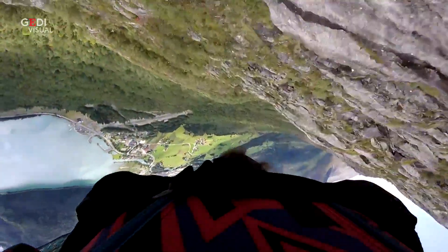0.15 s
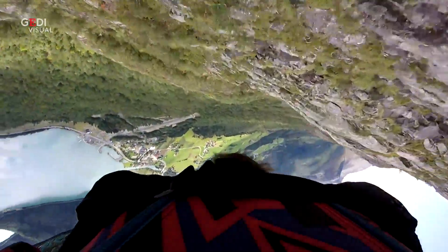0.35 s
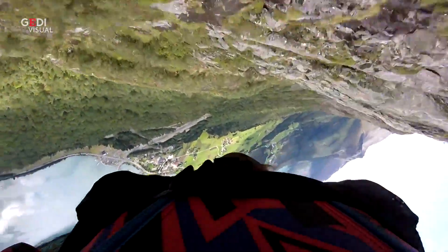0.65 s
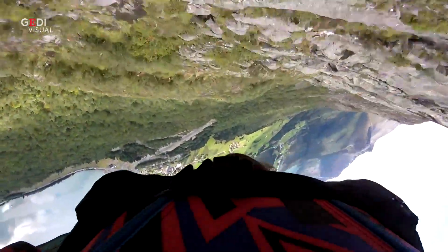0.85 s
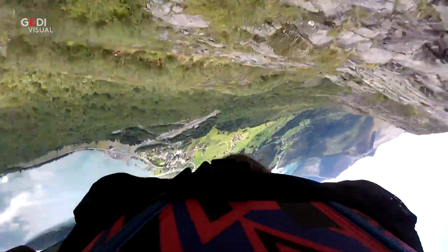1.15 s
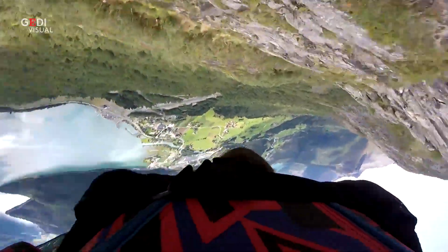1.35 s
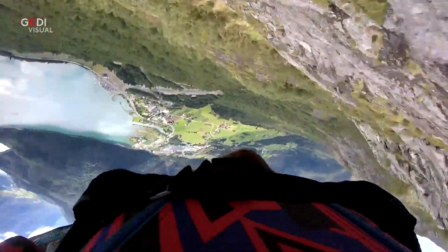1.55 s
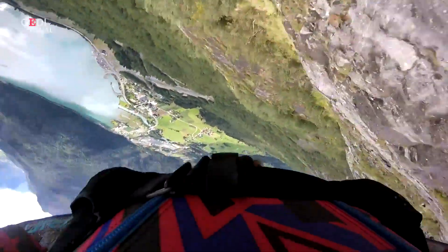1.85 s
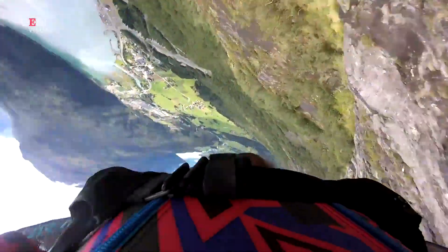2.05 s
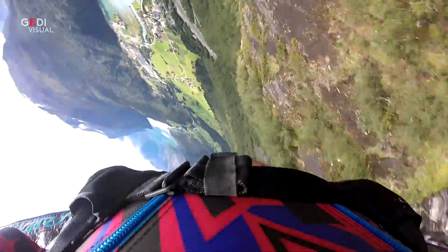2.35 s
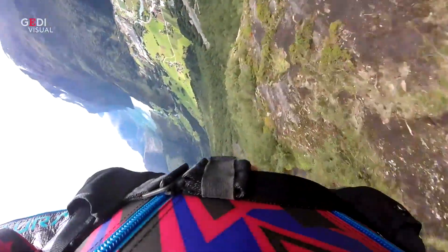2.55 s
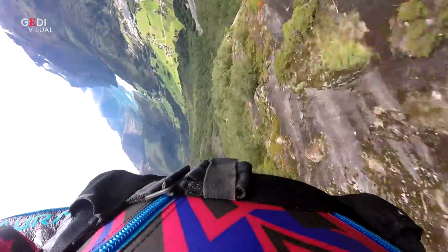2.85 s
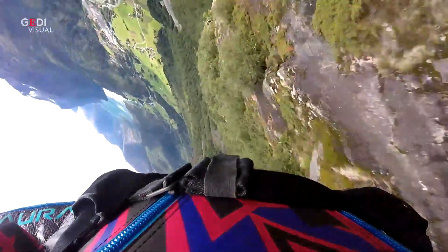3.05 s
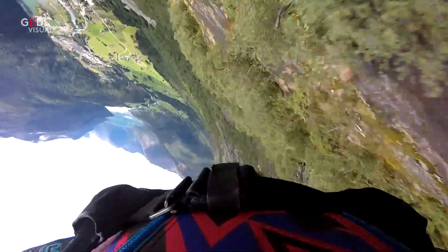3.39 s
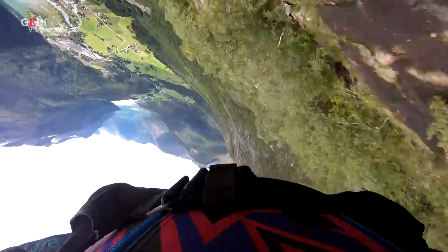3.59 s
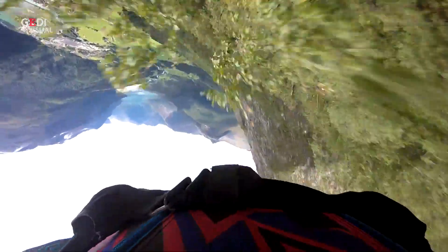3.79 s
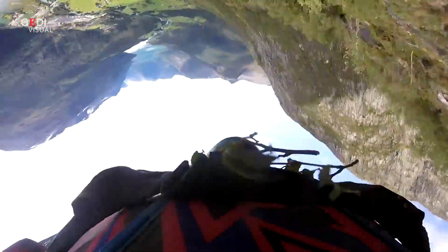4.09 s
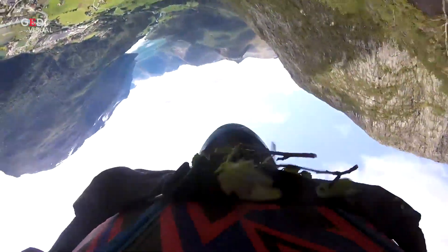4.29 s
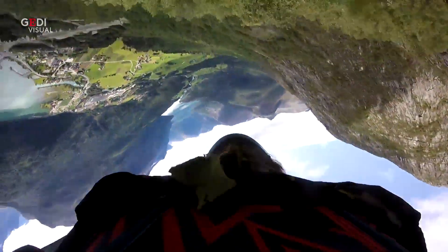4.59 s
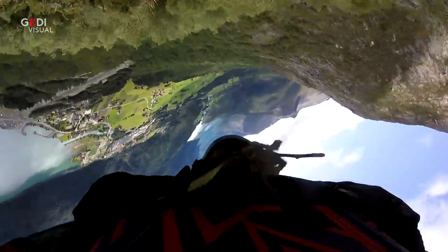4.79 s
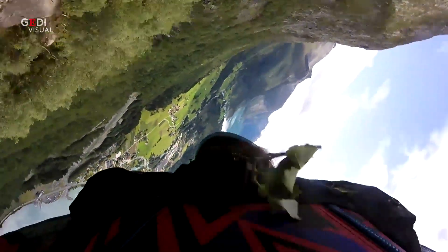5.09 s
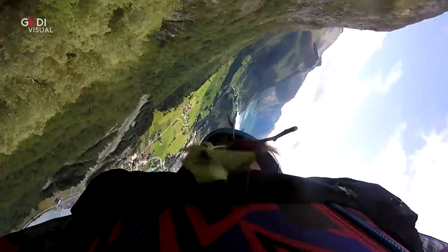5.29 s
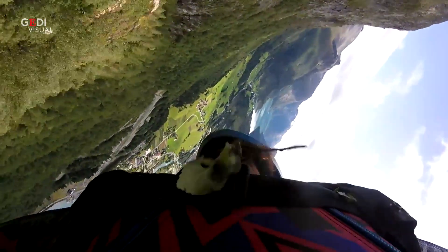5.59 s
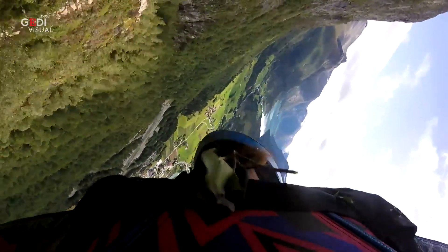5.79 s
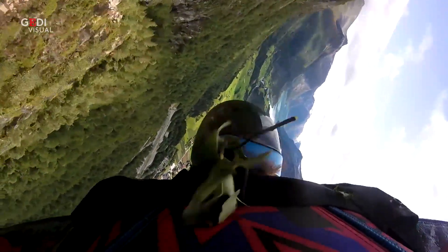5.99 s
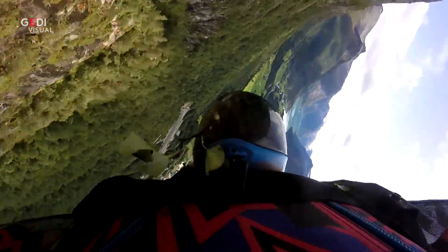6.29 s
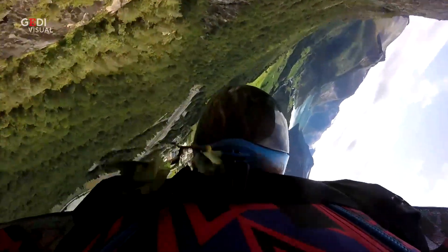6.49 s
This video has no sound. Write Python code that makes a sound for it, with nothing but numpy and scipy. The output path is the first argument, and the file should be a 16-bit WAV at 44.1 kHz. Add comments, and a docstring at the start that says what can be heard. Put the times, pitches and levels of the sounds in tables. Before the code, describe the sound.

A fast glide along a mountainside, heard from a microphone worn on the body. Dense wind dominates throughout: low thumping, throaty buffeting and a thinner airy hiss, wavering rapidly. After about four seconds a twig smacks and scrapes the housing with a hard crack; the wind ducks for a moment and swells back. Snagged leaves then tick and rustle irregularly over the continuing rush.

```python
"""Along a mountainside, air tears past a chest-mounted camera during a fast glide.
Eddies buffet the microphone port: shaped random spectra give thump, buffeting, roar and hiss.
Leaves tick and rustle on the housing and a twig whips it; short noises and blows excite its resonances.
Gain control ducks after each strong peak, then recovers; clipping and a band limit follow."""
import sys
import numpy as np
from scipy import signal
from scipy.io import wavfile
from scipy.ndimage import uniform_filter1d

SR = 44100
rng = np.random.default_rng(int(sys.argv[2]) if len(sys.argv) > 2 else 0)


def master_out(mix):
    """Clip the mix to full scale and print it as 16-bit PCM to the path in sys.argv[1]."""
    frames = np.transpose(np.atleast_2d(mix))
    ceiling = np.clip(frames, -1, 1)
    pcm = np.round(ceiling * 32767).astype(np.int16)
    wavfile.write(sys.argv[1], SR, pcm)


N = 292824

# Fine turbulence at the port, following the angle of the airflow; level before flutter
# [t/s, hiss level/dB]
HISS_LEVEL = [(0.0, -51.5), (0.07, -44), (0.11, -37), (0.21, -44), (0.3, -40.5), (0.37, -39), (0.39, -44.5),
              (0.44, -44.5), (0.67, -45.5), (0.92, -43), (1.19, -43), (1.27, -41.5), (1.38, -40.5),
              (1.5, -45.5), (1.61, -39.5), (1.8, -39), (1.9, -45.5), (2.09, -41), (2.45, -39.5),
              (2.53, -44.5), (2.66, -44), (2.75, -39.5), (3.02, -40), (3.3, -40.5), (3.6, -41),
              (3.8, -41.5), (4.05, -42), (4.35, -40.5), (4.43, -39), (4.45, -35.5), (4.6, -35), (4.72, -34),
              (4.75, -38.5), (4.82, -41), (4.98, -45.5), (5.15, -41.5), (5.35, -42), (5.59, -38),
              (5.65, -46), (5.8, -43), (5.95, -51.5), (6.19, -48), (6.3, -39), (6.55, -36), (6.64, -39.5)]
# Roar level relative to the hiss [t/s, level/dB]
ROAR_ABOVE_HISS = [(0.0, 8), (1.5, 7.5), (3.2, 7.5), (3.55, 11), (4.03, 11), (4.3, 6), (4.45, 7.5),
                   (4.6, 8.5), (4.75, 7), (5.2, 8), (6.64, 7)]
# Large eddies at the port; levels before flutter [t/s, buffeting level/dB, deep thump level/dB]
LARGE_EDDIES = [(0.0, -14.5, -20), (0.3, -15, -15), (0.65, -12.5, -24), (0.9, -14, -18.5),
                (1.15, -13.5, -22), (1.5, -16.5, -18.5), (2.0, -13, -18.5), (2.25, -16, -18.5),
                (3.4, -16, -18.5), (4.3, -18, -21), (4.5, -15, -21.5), (4.7, -15, -16.5), (4.9, -17, -20.5),
                (5.4, -17, -17.5), (6.0, -17.5, -17.5), (6.64, -14, -13.5)]
# Relative spectral densities of the four parts of the air noise [f/Hz, level per hertz/dB]
THUMP_SPECTRUM = [(12, -40), (20, -2), (40, 0.5), (80, 3), (150, 2.5), (230, -5.5), (400, -39)]
BUFFET_SPECTRUM = [(90, -5), (150, -8), (230, -1.5), (350, -3.5), (560, -7), (720, -13.5), (950, -24.5),
                   (1500, -36.5)]
ROAR_SPECTRUM = [(400, -22), (750, -2), (1000, -1), (1500, -2), (2050, -4.5), (2250, -14), (3200, -12),
                 (5000, -24)]
HISS_SPECTRUM = [(1200, -65), (2300, -2), (3000, -5.5), (3750, -3.5), (4000, -6.5), (4700, -9),
                 (5500, -6.5), (6400, -5), (7400, -10), (10000, -14), (11300, -21), (12600, -22),
                 (14000, -28.5), (15600, -33)]
# Resonant modes of the housing, before contact damping and tilt [f/Hz, width of one stage/Hz, level/dB]
HOUSING_MODES = [(280, 350, -14), (560, 400, -12), (990, 340, -7), (2030, 400, -8), (2900, 1100, -18),
                 (3700, 1800, -15), (5450, 1300, -14.5), (7200, 2000, -18), (9100, 2800, -27),
                 (11000, 2600, -35), (13000, 2200, -43)]
# Leaves and twig ends touching the housing
# [t/s, level/dB, lightness/(dB per octave), sharpness/(dB per octave)]
LEAF_TICKS = [(3.7285, -27, 1, 7), (4.0729, -21, 5, 4), (4.0759, -18, 6, 1), (4.082, -15, 3, 6),
              (4.1162, -24, 2, 4), (4.1568, -17, -3, 12), (4.1615, -20, -5, 3), (4.4495, -12, 8, 1),
              (4.8018, -25, -3, 4), (4.8284, -30, 10, 0), (5.2277, -24, 6, 0), (5.2344, -29, 8, -1),
              (5.2514, -26, 5, 4), (5.2738, -19, 4, -1), (5.6015, -24, 6, 2), (5.8743, -33, 5, 2),
              (5.9357, -32, -5, 4), (5.9455, -33, -2, 3), (5.9775, -25, -12, -4), (5.9945, -28, -8, -2),
              (6.0041, -26, 8, -1), (6.0308, -32, -4, -2), (6.0638, -30, -5, 1), (6.0715, -36, 3, -6),
              (6.084, -22, 14, -1), (6.1562, -27, -8, 0), (6.2346, -25, 12, -2), (6.3418, -28, 7, 0),
              (6.4788, -18, 9, -2), (6.557, -25, 5, 1)]
# Scrape of the twig [t/s, level/dB]
TWIG_SCRAPE = [(4.045, -52), (4.052, -31), (4.056, -28), (4.0605, -27), (4.0628, -26), (4.0642, -13),
               (4.0675, -7.5), (4.0686, -28), (4.078, -30), (4.092, -34), (4.105, -40)]
# Woody part of the twig knocking on the housing [t/s, peak level/dB, lightness/(dB per octave)]
TWIG_KNOCKS = [(4.0528, -11, -9), (4.0592, -13, 9), (4.0612, -13, 9), (4.0628, 3, -2), (4.0649, 2, -2),
               (4.0815, -10, 5)]
# Snagged leaves flapping [t/s, level/dB]
LEAF_RUSTLE = [(4.07, -34), (4.2, -43), (4.35, -54), (5.7, -54), (5.85, -47), (6.25, -47), (6.64, -54)]

# The buffeting rises in pitch as the roar swells; pitch is a frequency ratio
PITCH_AT_USUAL_ROAR, PITCH_PER_DB, USUAL_ROAR_DB, PITCH_SMOOTH_S = 0.97, .022, -33.5, 0.083
MAIN_MODE_HZ, PANEL_TOP_HZ = 5400, 2500
TICK_FALL_20_DB_S, TICK_SNAP = .0024, 6
LEAF_LOW_HZ, LEAF_DAMPING = 2300, 4  # damping multiplies the widths of the panel modes
WOOD_TOP_HZ, WOOD_DAMPING = 1550, 1.3
TAPS_PER_S, TAP_DECAY_S = 150, .0015
DUCK_ABOVE_DB, DUCK_SHARE, DUCK_LAG_S = -6, 0.92, 0.0004
EXCESS_FALL_DB_PER_S = 34.  # fall of the held excess, before DUCK_SHARE scales it
BAND_EDGE_HZ = 15300


def gain_of(db):
    """Logarithmic level: decibels become an amplitude factor."""
    return 10 ** (np.asarray(db) / 20)


def evened(x):
    """Power normalisation: the rms becomes one."""
    return x / np.sqrt(np.mean(x ** 2) + 1e-20)


def curves(table):
    """Linear interpolation: each column after time gets one value a sample."""
    t, *columns = np.transpose(table)
    return [np.interp(np.arange(N) / SR, t, column) for column in columns]


def flutter(span_s):
    """Smoothed randomness: wavering of rms one that changes about every span_s seconds."""
    span = max(int(span_s * SR), 2)
    smooth = uniform_filter1d(rng.standard_normal(N), span)
    return evened(uniform_filter1d(smooth, span))


def turbulence(spectrum, patchy_db, size, pitch=np.ones(N)):
    """Short-time spectral synthesis: random spectra with drifting patches, slid in frequency by pitch."""
    hop = size // 4
    frames = N // hop + 5
    hz = np.fft.rfftfreq(size, 1 / SR)
    real, imaginary, patches = rng.standard_normal((frames, len(hz), 3)).T
    patches = uniform_filter1d(patches, size=6, axis=0)  # across frequency
    patches = evened(uniform_filter1d(patches, size=12, axis=1))  # across time
    f, db = np.transpose(spectrum)
    slide = pitch[np.minimum(np.arange(frames) * hop, N - 1)]
    log_hz = np.log((hz[:, None] + 1) / slide)
    shape_db = np.interp(log_hz, np.log(f), db, left=-90, right=-90)
    magnitude = gain_of(shape_db + patchy_db * patches) / np.sqrt(slide)  # the root keeps the power steady
    spectra = (real + 1j * imaginary) * magnitude
    return evened(signal.istft(spectra, nperseg=size, noverlap=size - hop)[1][:N])


def wind():
    """Turbulence over many scales: lumps of air shake all four noise bands, quicker puffs the fine ones."""
    buffet_db, thump_db = curves(LARGE_EDDIES)
    hiss_db = curves(HISS_LEVEL)[0]
    roar_db = hiss_db + curves(ROAR_ABOVE_HISS)[0]
    slow_roar_db = uniform_filter1d(roar_db, int(PITCH_SMOOTH_S * SR))
    pitch = PITCH_AT_USUAL_ROAR + PITCH_PER_DB * (slow_roar_db - USUAL_ROAR_DB)

    gusts, lumps, puffs = flutter(0.0025), flutter(0.0082), flutter(0.002)
    surges, heaves = flutter(0.04), flutter(0.15)
    # the factors of the flutters are rms swings in dB
    thump_db = thump_db + 1.1 * heaves + 1.73 * lumps
    buffet_db = buffet_db + 1.09 * lumps
    roar_db = roar_db + 0.33 * surges + 0.12 * gusts + 1.0 * lumps + 1.16 * puffs
    hiss_db = hiss_db + 0.94 * surges + 0.47 * gusts + 0.55 * lumps + 1.64 * puffs

    thump = gain_of(thump_db) * turbulence(THUMP_SPECTRUM, patchy_db=-0.65, size=4096)
    buffet = gain_of(buffet_db) * turbulence(BUFFET_SPECTRUM, patchy_db=0.5, size=2048, pitch=pitch)
    roar = gain_of(roar_db) * turbulence(ROAR_SPECTRUM, patchy_db=-1.0, size=512)
    hiss = gain_of(hiss_db) * turbulence(HISS_SPECTRUM, patchy_db=0.0, size=512)
    return thump + buffet + roar + hiss


def resonate(x, hz, width):
    """Heterodyne resonance: shift to zero frequency, low-pass by a double pole, shift back; centre gain one."""
    turn = np.exp(2j * np.pi * hz * np.arange(len(x)) / SR)
    r = np.exp(-np.pi * width / SR)
    return 2 * (turn * signal.lfilter([(1 - r) ** 2], [1, -2 * r, r * r], x / turn)).real


def housing(force, light_db, sharp_db, damping=1):
    """Modal superposition: lightness spares modes below the main one, sharpness stirs those above."""
    out = np.zeros(len(force))
    for hz, width, db in HOUSING_MODES:
        octaves = np.log2(hz / MAIN_MODE_HZ)
        tilt_db = octaves * (light_db if octaves < 0 else sharp_db)
        # soft contact widens the panel modes
        width = width * (damping if hz < PANEL_TOP_HZ else 1)
        mode = resonate(resonate(force, hz, width), hz, width)
        out = out + gain_of(db + tilt_db) * mode * np.sqrt(SR / width)
    return out


def leafy(x):
    """Inertia of the striker: leaves are too light to stir the lowest modes."""
    return signal.sosfilt(signal.butter(3, LEAF_LOW_HZ, "high", fs=SR, output="sos"), x)


def ticks():
    """Transient excitation: a snap and a few milliseconds of scratch set the housing ringing."""
    out = np.zeros(N)
    t = np.arange(1200) / SR
    touch = np.minimum(t / .0003, 1) * gain_of(-20 * (t / TICK_FALL_20_DB_S) ** 1.5)
    snap = TICK_SNAP * signal.unit_impulse(len(t))
    noises = rng.standard_normal((len(LEAF_TICKS), len(t)))
    for (start_s, level_db, light_db, sharp_db), noise in zip(LEAF_TICKS, noises):
        ring = housing(leafy(noise * touch + snap), light_db, sharp_db, LEAF_DAMPING)
        ring = ring * np.linalg.norm(touch) / np.linalg.norm(ring)  # same energy as the envelope
        at = round(start_s * SR)
        out[at:at + len(t)] += gain_of(level_db) * ring
    return out


def twig_scrape():
    """Friction excitation: random scraping drives the housing, brighter as the effort grows."""
    s, level_db = np.transpose(TWIG_SCRAPE)
    t = np.arange(s[0], s[-1], 1 / SR)
    effort_db = np.interp(t, s, level_db)
    sharp_db = np.interp(effort_db, [-30, -15], [2, 15])
    noise = rng.standard_normal(len(t))
    ring = evened(housing(noise, light_db=4, sharp_db=sharp_db, damping=LEAF_DAMPING))
    out = np.zeros(N)
    at = round(s[0] * SR)
    out[at:at + len(t)] = gain_of(effort_db) * ring
    return out


def twig_knocks():
    """Impact excitation: blunt, low-passed blows of wood set the housing ringing."""
    out = np.zeros(N)
    low_pass = signal.butter(3, WOOD_TOP_HZ, fs=SR, output="sos")
    blunt = signal.sosfilt(low_pass, signal.unit_impulse(800))
    for start_s, peak_db, light_db in TWIG_KNOCKS:
        knock = -housing(blunt, light_db, sharp_db=0, damping=WOOD_DAMPING)
        at = round(start_s * SR)
        out[at:at + len(knock)] += gain_of(peak_db) * knock / abs(knock).max()
    return out


def rustle():
    """Random impulse train: many faint uneven taps from the caught leaves excite the housing."""
    size_db = 3 * np.minimum(rng.exponential(1, N), 3)
    taps = gain_of(size_db) * (rng.random(N) < TAPS_PER_S / SR)
    decay = np.exp(-np.arange(300) / (TAP_DECAY_S * SR))
    touch = signal.oaconvolve(taps, decay)[:N]
    noise = leafy(touch * rng.standard_normal(N))
    ring = evened(housing(noise, light_db=-7, sharp_db=3, damping=LEAF_DAMPING))
    caught = np.arange(N) > LEAF_RUSTLE[0][0] * SR  # silent before the first time listed
    return gain_of(curves(LEAF_RUSTLE)[0]) * ring * caught


def scene():
    """Linear superposition: wind, leaf ticks, twig and rustling leaves add in one channel."""
    return (wind() + ticks() + twig_scrape() + twig_knocks() + rustle())[None]


def record(dry):
    """Peak-hold gain control: gain falls a moment after each peak and creeps back; then clip and band limit."""
    level_db = 10 * np.log10(abs(uniform_filter1d(dry[0] ** 2, size=60)) + 1e-12)
    # a running maximum on a rising ramp holds each peak with a steady fall
    climb = np.arange(N) * EXCESS_FALL_DB_PER_S / SR
    held_db = np.maximum.accumulate(level_db + climb) - climb
    over_db = np.maximum(held_db - DUCK_ABOVE_DB, 0)
    lag = np.exp(-1 / (DUCK_LAG_S * SR))
    duck_db = DUCK_SHARE * signal.lfilter([1 - lag], [1, -lag], over_db)
    clipped = np.clip(dry / gain_of(duck_db), -.99, .99)
    band_limit = signal.firwin(767, BAND_EDGE_HZ, window=("kaiser", 9), fs=SR)
    return signal.oaconvolve(clipped, band_limit[None], "same")


dry = scene()
out = record(dry)
master_out(out)
```